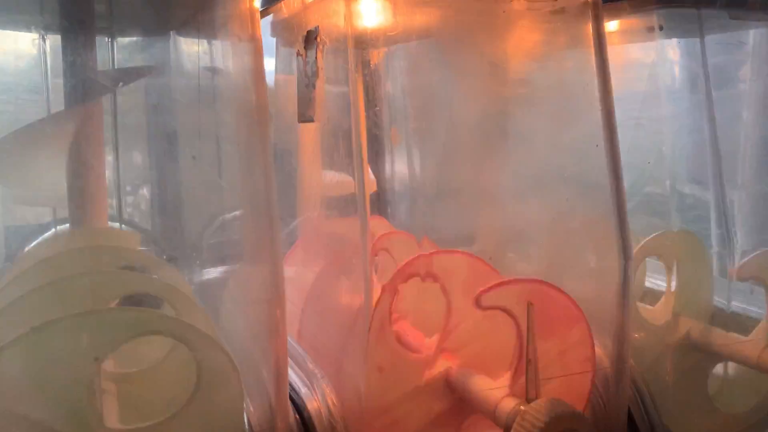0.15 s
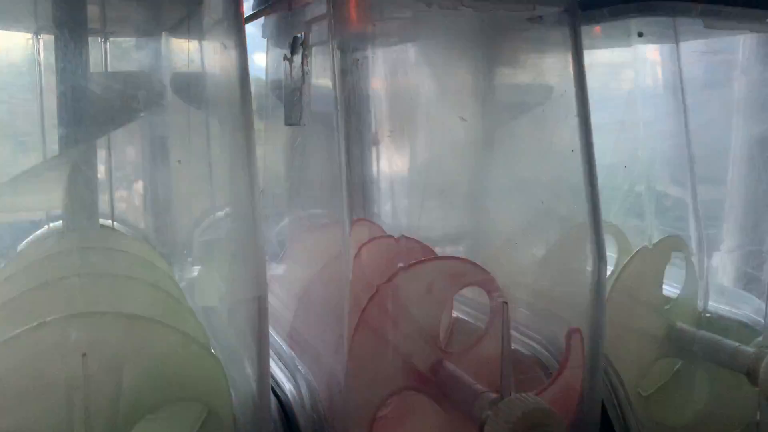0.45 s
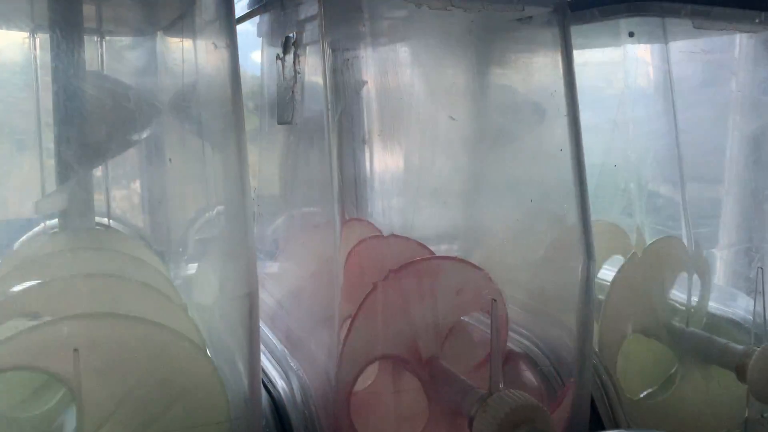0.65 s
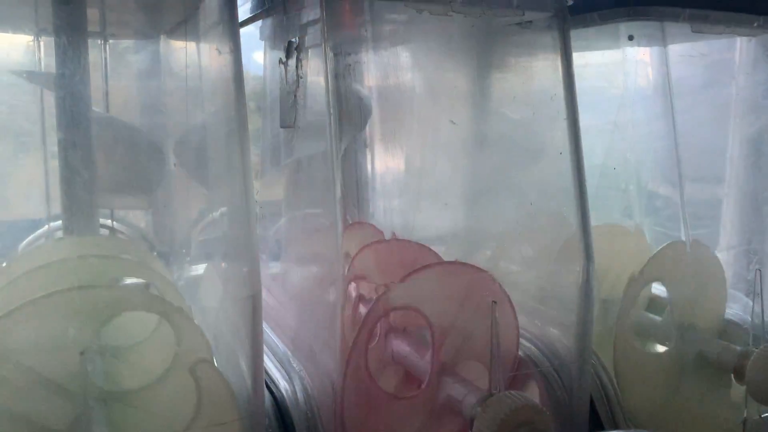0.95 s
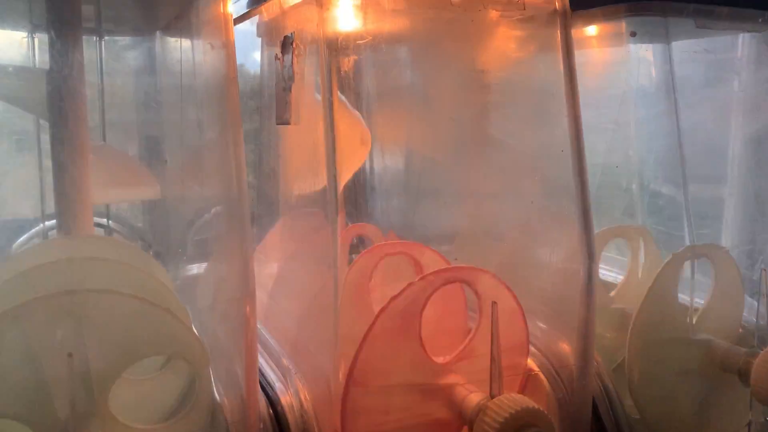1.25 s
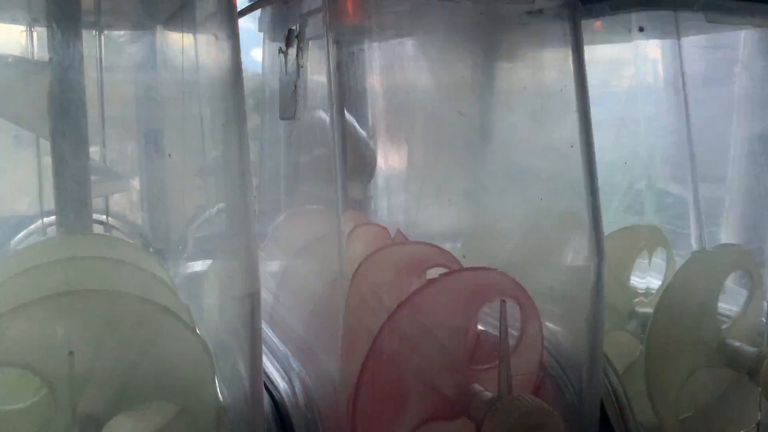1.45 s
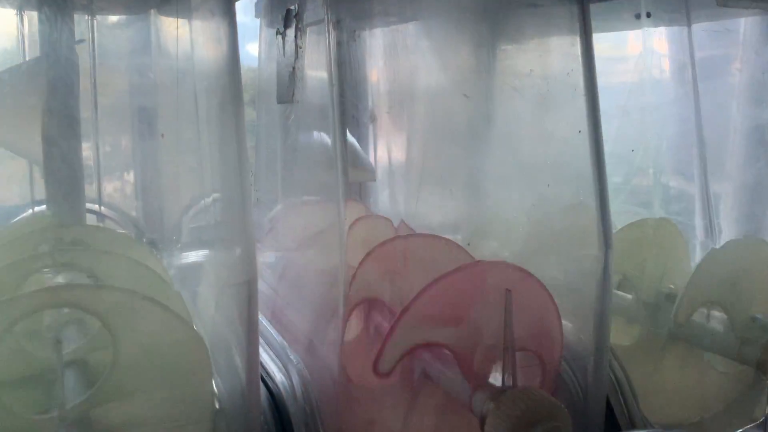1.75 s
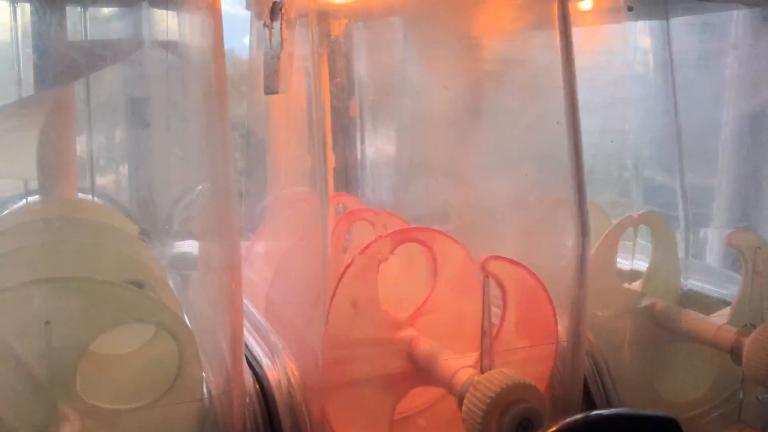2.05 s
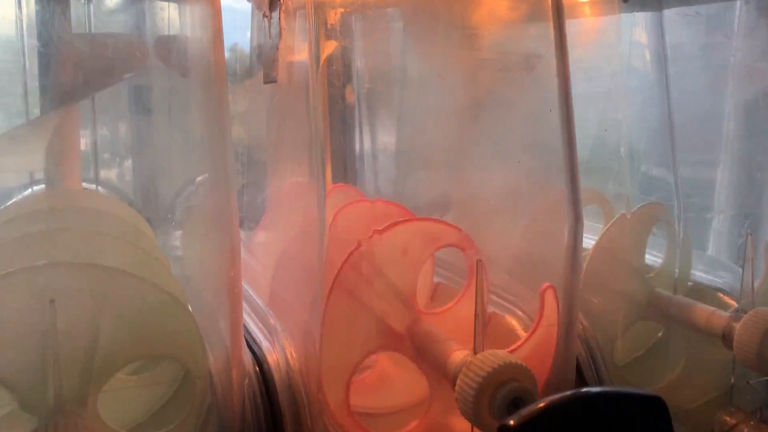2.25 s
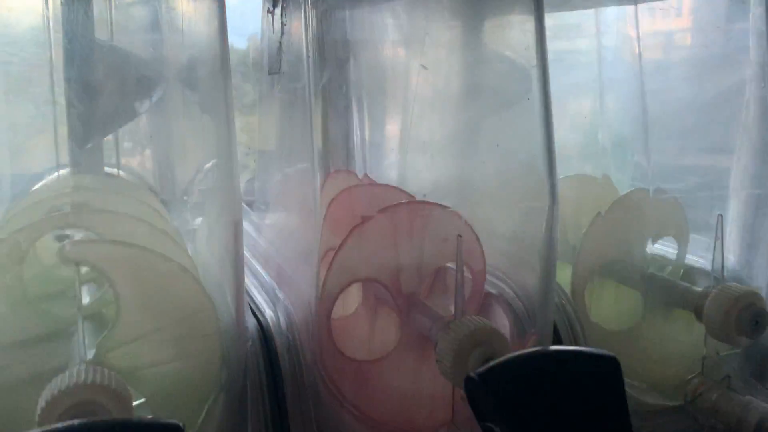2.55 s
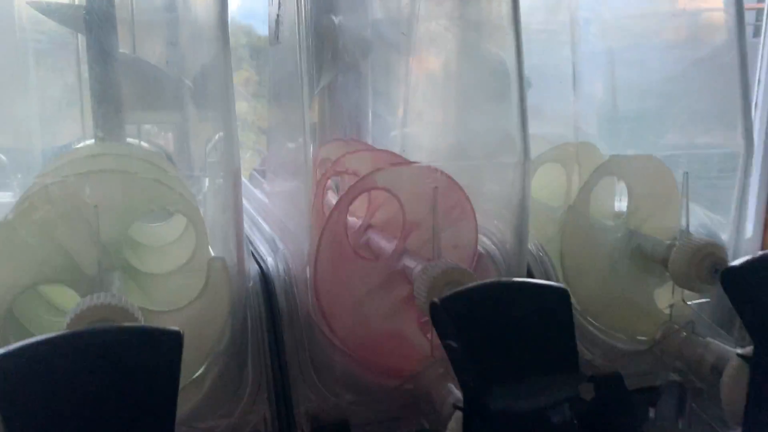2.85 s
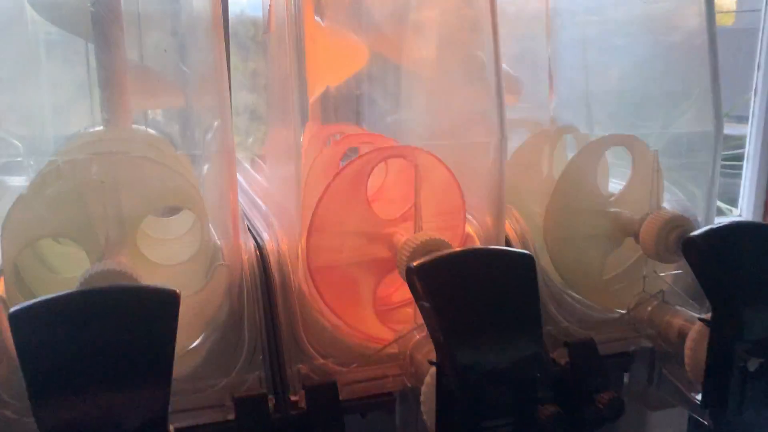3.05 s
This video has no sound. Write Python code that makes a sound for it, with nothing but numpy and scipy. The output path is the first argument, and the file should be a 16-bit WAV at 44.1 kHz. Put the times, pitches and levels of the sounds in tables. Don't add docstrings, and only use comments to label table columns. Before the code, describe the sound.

Close stereo sound of a frozen-drink machine in a room: deep motor hum and dull air roar throughout, thin gear tones swelling and fading, a soft bump near 0.4 seconds and small plastic ticks after.

```python
import sys
import numpy as np
from scipy import signal
from scipy.fft import rfft, irfft
from scipy.io import wavfile
from scipy.ndimage import uniform_filter1d

SR = 44100
rng = np.random.default_rng(int(sys.argv[2]) if len(sys.argv) > 2 else 0)


def amplitude_ratio(level_db):
    exponent = np.asarray(level_db, float) / 20
    return 10 ** exponent


def digitize_waveform(pressure):
    field = np.atleast_2d(pressure).T
    bounded = np.clip(field, -1, 1)
    quanta = np.round(bounded * 32767).astype(np.int16)
    wavfile.write(sys.argv[1], SR, quanta)


N = 140679

# freq_hz, density_db_per_hz
ROAR_SPECTRUM = [(25, -85), (42, -65), (60, -57), (130, -58.5), (400, -61.5), (480, -65), (715, -64.5),
                 (770, -67.5),
                 (1000, -73), (1400, -80), (2500, -82.5), (4000, -90.5), (6100, -100), (8200, -99), (9800, -106),
        (13000, -107)]
# time_s, gain_db
SWELL = [(0, -3), (.07, 0), (.45, 2), (.6, 0.5), (1.5, -1.5), (1.95, 0), (2.2, 1), (2.45, 1.5), (2.55, -2),
         (3.19, -2)]
# freq_hz, width_hz, boost_db
PANELS = [(78.6, 7.5, 0.5), (218, 23, 3.5), (246, 6, 2), (253.2, 7.4, 4), (294, 3.3, -2), (342, 6.4, 3),
          (387, 11, 1), (535, 36, 5.5), (590, 73, 0.5), (627, 54, 3), (684, 19, 4), (817, 59, 3),
          (1820, 710, 2.5), (3120, 140, 3), (7180, 230, 5), (7800, 180, 3.5), (33, 30, -13),
          (10900, 2800, 2.5)]
ROAR_DB, PANEL_RIPPLE_DB = 1, 2.0
ROLLOFF_HZ, ROLLOFF_DB = 14050, -18

# freq_hz, likeness_0_to_1
PORT_LIKENESS = [(60, 0.97), (380, 0.98), (490, 0.64), (700, 0.72), (950, 0.33), (6000, 0.1), (7300, 0.4),
                 (8300, 0.96)]
# freq_hz, lead_rad
PORT_LEAD = [(400, 0), (520, 1.17), (700, -1.08), (830, -2.5), (1300, -1.5)]
# freq_hz, left_minus_right_db
PORT_BALANCE = [(110, 1.8), (200, -4.5), (380, -2.5), (700, 0.5), (1290, -1), (2370, -0.5)]
PORT_DELAY_S, IN_STEP_HZ = .000312, 10230

# time_s, compressor_db, blades_db, whine_db, blade_overtone_db
HEARD = [(0, -47, -39, -66, -48), (.15, -43, -38, -72, -43.5), (.4, -41, -37, -68, -45),
         (.7, -44, -37.5, -74, -41), (.85, -43, -35.5, -69, -55), (1.1, -41, -35.5, -65, -39.5),
         (1.25, -44, -39.5, -66, -47), (1.5, -43, -37, -63, -39.5), (1.9, -39.5, -36, -68, -54.5),
         (2.4, -41.5, -35.5, -74, -44), (2.6, -47, -38.5, -73, -53), (2.75, -47, -45.5, -79, -44),
         (3.0, -47, -34, -75, -38.5), (3.19, -43, -37, -80, -42)]

FAN_ORDERS = [(0, 2), (0, 6), (26, 0), (25, 2), (26, 2), (27, 2), (26, 4)]
# level_db, left_lead_rad
FAN_LINES = [(-44, -0.0083), (-52.5, 0.75), (-49, -0.61), (-55.5, -0.63), (-44.5, -0.74), (-52, -0.21),
             (-77, -1.3)]
FAN_HZ, MAINS_HZ = 22.41, 50.04
BEAT_PEAK_S = .365

COMPRESSOR_ORDERS = [2, 6, 7, 9, 24, 26, 107, 113, 130, 136, 146, 157]
# level_db, left_minus_right_db, left_lead_rad
COMPRESSOR_LINES = [(-48, 0, .2), (-52, -3, .2), (-52, -5, .2), (-56, -6, -.2), (-67, -1, -1.2),
                    (-66, -1, 1.2), (-83, -1, -2.3), (-77, -3, 2.3), (-81, -4, .6), (-82, -4, 1.2),
                    (-77, 9, .7), (-84, 3, -.6)]
# freq_hz, width_hz, level_db
SHELL = [(8450, 250, -80), (8900, 120, -83), (9110, 50, -78), (10720, 260, -80), (11127, 50, -82),
         (11350, 90, -80), (11640, 200, -80), (12910, 70, -77), (13490, 120, -83)]
COMPRESSOR_HZ = 49.23

# time_s, low_gear_db, high_gear_db, drone_db
LOAD = [(0, -47, -48, -45), (.15, -43, -41.5, -46), (.42, -46, -49, -51), (.57, -44, -33.5, -42),
        (.8, -40, -42.5, -59), (.95, -40.5, -42.5, -41.5), (1.15, -38, -35.5, -47), (1.4, -41.5, -39, -49),
        (1.6, -44.5, -37, -44), (1.85, -42, -39.5, -43.5), (2.07, -48, -46.5, -42.5),
        (2.2, -33.5, -35.5, -40.5), (2.37, -40.5, -51, -37.5), (2.5, -48, -47.5, -48),
        (2.63, -35, -49, -45), (2.78, -41.5, -51.5, -52), (2.92, -31.5, -40.5, -64), (3.05, -48, -57, -52)]
LOW_GEAR_HZ, HIGH_GEAR_HZ, DRONE_HZ, MESH_WANDER_HZ = 640.5, 826.3, 381.5, .9

# start_s, level_db, length_s, centre_hz, width_octaves
KNOCKS = [(0.117, -45.5, 0.016, 3300, 1), (0.13, -55, 0.029, 6200, 1.3), (.165, -46, 0.027, 1750, 0.061),
          (.385, -41.5, 0.026, 1870, 0.53), (0.392, -33.5, 0.048, 650, 0.38), (.418, -38, 0.018, 320, 1.3),
          (.11, -57, .02, 15200, .12), (.205, -62, .02, 15500, .02), (.435, -63, .02, 15600, .03),
          (.414, -60, .008, 9000, .8), (0.425, -42, 0.02, 2290, 0.091), (0.441, -57, .008, 10000, .25),
          (.36, -34, 0.06, 110, 0.43), (0.51, -43, 0.026, 1850, 0.3), (0.685, -46, 0.035, 2340, 0.1),
          (1.708, -50, 0.014, 2200, 0.7), (2.62, -46, .02, 2300, 0.52), (2.808, -44, 0.024, 1200, 0.18),
          (2.882, -45, .02, 1500, .4), (2.2, -41, .018, 1700, .5), (2.16, -49, .015, 3000, 0.27),
          (1.975, -43, .015, 2200, 0.24), (1.032, -32, 0.014, 640, 0.31), (.737, -40, .015, 780, 0.45),
          (1.1, -38, 0.013, 700, 0.34), (1.177, -41, 0.024, 2200, .7), (2.1, -49, 0.061, 1840, 0.21),
          (1.957, -54, 0.053, 8000, 0.86), (1.958, -44, 0.064, 2160, 0.99), (1.6, -50, .025, 1800, 0.36),
          (1.7, -55, 0.047, 230, 1.), (2.148, -53, 0.042, 3400, 0.8), (2.18, -44.5, 0.1, 1800, 0.61),
          (2.269, -35, 0.03, 340, 0.95), (3.115, -50, .03, 3000, .3), (2.95, -48, 0.077, 1670, .3)]
# start_s, level_db, length_s, pitch_hz
GROANS = [(0.018, -38, .07, 343), (.04, -42, 0.067, 545), (0.376, -38, 0.075, 334), (0.459, -43, .07, 250),
          (0.846, -37.5, .06, 249), (.93, -42, 0.051, 339), (1.79, -39.5, .06, 342),
          (2.098, -36, .07, 345.2), (2.45, -38, 0.063, 342), (2.66, -36.5, 0.048, 240),
          (2.56, -40, .05, 201), (2.9, -40, 0.057, 221.6), (2.78, -39, 0.063, 585),
          (2.83, -39, 0.042, 528.4)]
RISE_SHARE = 0.1
RATTLE_DB, RATTLES_PER_S = -56.5, 90


def evened(x):
    return x / np.sqrt(np.mean(x ** 2) + 1e-20)


def read(points, hz):
    point_hz, value = np.transpose(points)
    return np.interp(np.log(hz + 1), np.log(point_hz + 1), value)


def curve(table, order):
    columns = np.transpose(table)
    return np.interp(np.arange(N) / SR, columns[0], columns[order])


def drift(rate_hz, count=1):
    steps = rng.standard_normal((count, 400))
    lowpass = np.exp(-(np.arange(201) * SR / N / rate_hz) ** 2)
    smooth = np.fft.irfft(rfft(steps) * lowpass)
    position = np.arange(N) * 399 / N
    return np.array([np.interp(position, np.arange(400), evened(s - s.mean())) for s in smooth])


def port_lead(hz):
    delay_rad = -2 * np.pi * PORT_DELAY_S * (hz - IN_STEP_HZ)
    return np.where(hz < 4000, read(PORT_LEAD, hz), delay_rad)


def right_port(left, other, likeness, hz):
    lag = np.exp(-1j * port_lead(hz)).reshape(np.shape(likeness))
    return (likeness * left + np.sqrt(1 - likeness ** 2) * other) * lag


def tone(turns, db, pan_db=0, lead=0):
    left = amplitude_ratio(pan_db / 2) * np.cos(2 * np.pi * turns + lead / 2)
    right = amplitude_ratio(-pan_db / 2) * np.cos(2 * np.pi * turns - lead / 2)
    return np.sqrt(2) * amplitude_ratio(db) * np.array([left, right])


def add(mix, start_s, sound):
    part = mix[:, round(start_s * SR):][:, :sound.shape[1]]
    part += sound[:, :part.shape[1]]


def ring_panels(air):
    hz = np.fft.rfftfreq(N + 1, 1 / SR)
    ripple = evened(uniform_filter1d(rng.standard_normal(len(hz)), size=40))
    gain_db = PANEL_RIPPLE_DB * ripple * (abs(hz - 3000) < 2000)
    for panel_hz, width_hz, boost_db in PANELS:
        gain_db = gain_db + boost_db / (1 + (2 * (hz - panel_hz) / width_hz) ** 2)
    return irfft(rfft(air) * amplitude_ratio(gain_db))[:, :N]


def roar():
    frames, hz = N // 512 + 6, np.fft.rfftfreq(2048, 1 / SR)
    a, b, c, d, patches = rng.standard_normal((frames, 1025, 5)).T
    patches = uniform_filter1d(patches, size=24, axis=0)
    patches = evened(uniform_filter1d(patches, size=6, axis=1))

    time_s, effort_db = np.transpose(SWELL)
    swell_db = np.interp(np.arange(frames) * 512 / SR, time_s, effort_db)
    follow = np.where(hz < 900, .8, .4)[:, None]
    rolloff = 1 / (1 + np.exp(np.clip((ROLLOFF_HZ - hz) / 60, -50, 50)))
    colour_db = (read(ROAR_SPECTRUM, hz) + ROLLOFF_DB * rolloff)[:, None]
    level_db = colour_db + 1.33 * patches + follow * swell_db + ROAR_DB + 13

    likeness = np.clip(read(PORT_LIKENESS, hz), 0, 1)[:, None]
    left = a + 1j * b
    right = right_port(left, c + 1j * d, likeness, hz)
    half = amplitude_ratio(read(PORT_BALANCE, hz) / 2)[:, None]
    spectrum = np.array([left * half, right / half]) * amplitude_ratio(level_db)
    air = signal.istft(spectrum, nperseg=2048, noverlap=1536)[1][:, :N + 1]
    return ring_panels(air)


def fan():
    t = np.arange(N) / SR - BEAT_PEAK_S
    out = tone(5 * FAN_HZ * t, curve(HEARD, order=2))
    out += tone(10 * FAN_HZ * t, curve(HEARD, order=4), 0, .48)
    wanders = drift(4.6, count=len(FAN_LINES))
    for (shaft, mains), (db, lead), wander in zip(FAN_ORDERS, FAN_LINES, wanders):
        line_hz = shaft * FAN_HZ + mains * MAINS_HZ
        out += tone(line_hz * t, db + 1.3 * wander, 0, lead)
    return out


def shell_ring(turns):
    wander, comb = amplitude_ratio(4 * drift(5, count=6)), np.zeros(N)
    for k in range(165, 280):
        shift, spread = rng.random(2)
        power = 0
        for shell_hz, width_hz, db in SHELL:
            power += amplitude_ratio(2 * db) * np.exp(-(2 * (k * COMPRESSOR_HZ - shell_hz) / width_hz) ** 2)
        if power > 2e-10:
            level = np.sqrt(2 * power) * amplitude_ratio(-4 * spread) * wander[k % 6]
            comb += level * np.cos(2 * np.pi * (k * turns + shift))
    lag = np.exp(-1j * port_lead(np.fft.rfftfreq(N + 1, 1 / SR)))
    late = irfft(rfft(comb, N + 1) * lag)[:N]
    return np.array([comb, late])


def compressor():
    turns = np.cumsum(COMPRESSOR_HZ + 0.021 * drift(3.6)[0]) / SR
    out = tone(turns, curve(HEARD, order=1))
    out += tone(148 * turns, curve(HEARD, order=3) - 3, 9, 2.6)
    wanders = drift(2.6, count=len(COMPRESSOR_LINES))
    for k, (db, pan_db, lead), wander in zip(COMPRESSOR_ORDERS, COMPRESSOR_LINES, wanders):
        out += tone(k * turns + rng.random(), db + 2.1 * wander, pan_db, lead)
    return out + shell_ring(turns)


def gears():
    low, high, drone = MESH_WANDER_HZ * drift(4.8, count=3)
    low_turns = np.cumsum(LOW_GEAR_HZ + low) / SR
    high_turns = np.cumsum(HIGH_GEAR_HZ + .5 * high) / SR
    drone_turns = np.cumsum(DRONE_HZ + 2 * drone) / SR
    out = tone(low_turns, curve(LOAD, order=1), -0.55, -1.09)
    out += tone(high_turns, curve(LOAD, order=2), -1.4, -2.41)
    out += tone(drone_turns, curve(LOAD, order=3) + high)
    return out


def burst(length_s, hz, octaves):
    size = min(int(length_s * SR * 2) + 64, 6144)
    u, f = np.arange(size) / (length_s * SR), np.fft.rfftfreq(size, 1 / SR)
    left, other = rfft(rng.standard_normal((2, 6144))[:, :size])
    likeness = np.clip(read(PORT_LIKENESS, f), 0, 1)
    ports = np.array([left, right_port(left, other, likeness, f)])
    band = np.exp(-(np.log2((f + 1) / hz) / octaves) ** 2)
    noise = irfft(ports * band, size)
    return evened(noise) * np.minimum(u / RISE_SHARE, 1) * np.exp(-2 * u ** 2)


def groan(length_s, hz):
    u = np.arange(0, 2, 1 / (length_s * SR))
    turns = np.cumsum(hz * (1 - 0.0089 * u)) / SR + rng.random()
    return tone(turns, 0) * np.sin(np.pi * u / 2) ** 2


def augers():
    out = np.zeros((2, N))
    for start_s, db, length_s, hz, octaves in KNOCKS:
        add(out, start_s, amplitude_ratio(db) * burst(length_s, hz, octaves))
    for start_s, db, length_s, hz in GROANS:
        add(out, start_s, amplitude_ratio(db) * groan(length_s, hz))
    rattles = rng.random((400, 4))[:int(RATTLES_PER_S * N / SR)]
    for when, pitch, long, size in rattles:
        level = amplitude_ratio(RATTLE_DB + 4 * size - 9 * pitch)
        add(out, when * N / SR, level * burst(0.021 + 0.018 * long, 1300 * 3.5 ** pitch, 0.12))
    return out


def scene():
    fade_in = np.minimum(np.arange(N) / (0.0024 * SR), 1)
    return (roar() + fan() + compressor() + gears() + augers()) * fade_in


def low_pass(x):
    return signal.sosfilt(signal.butter(12, 15700, fs=SR, output="sos"), x)


def record(dry):
    return low_pass(dry)


dry = scene()
out = record(dry)
digitize_waveform(out)
```